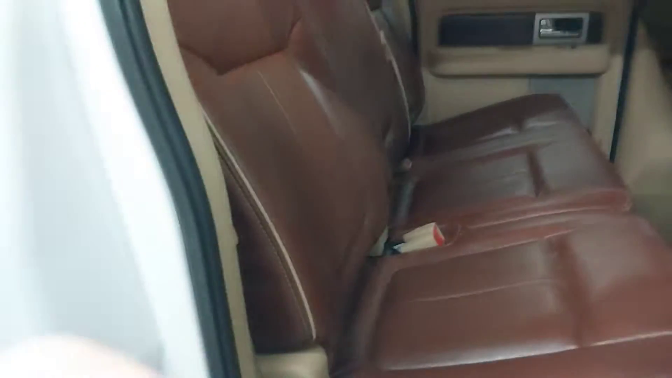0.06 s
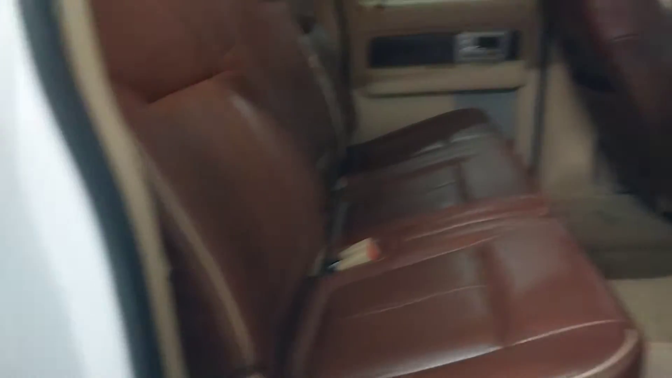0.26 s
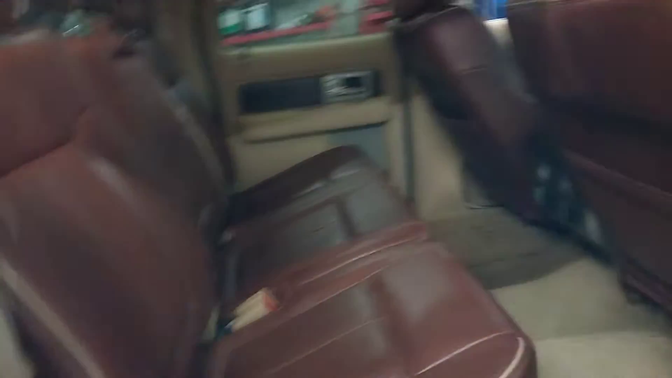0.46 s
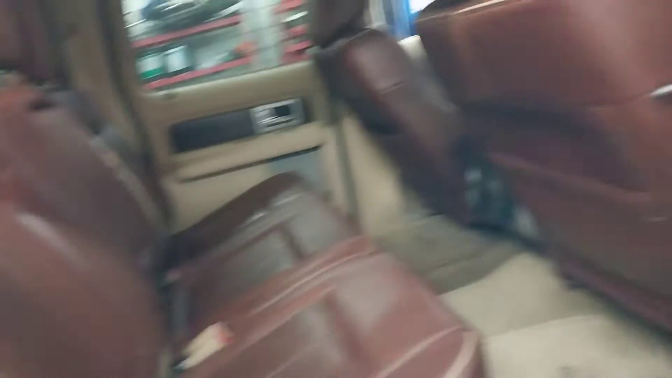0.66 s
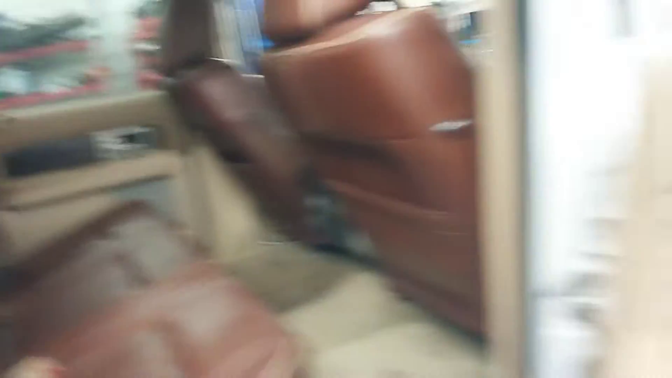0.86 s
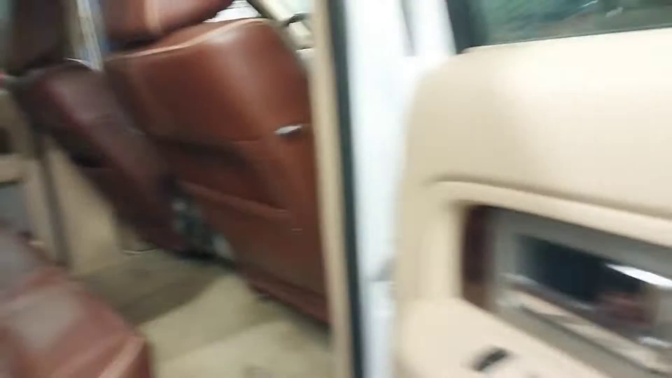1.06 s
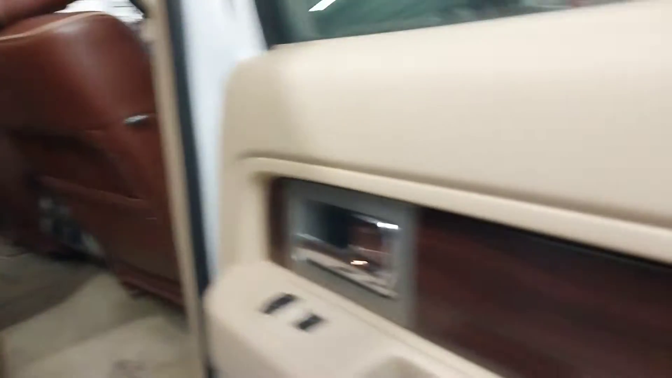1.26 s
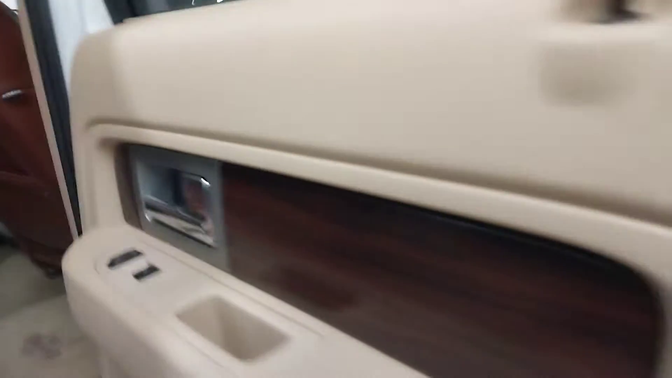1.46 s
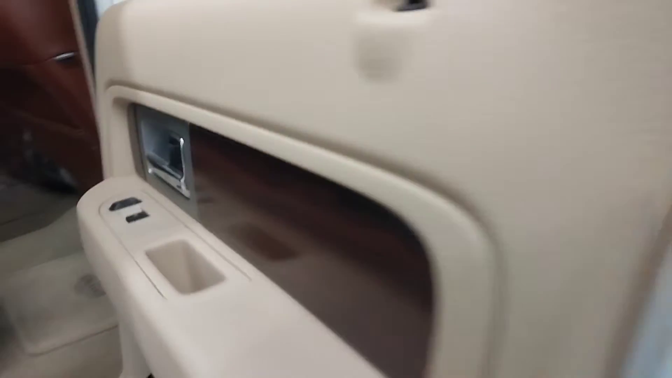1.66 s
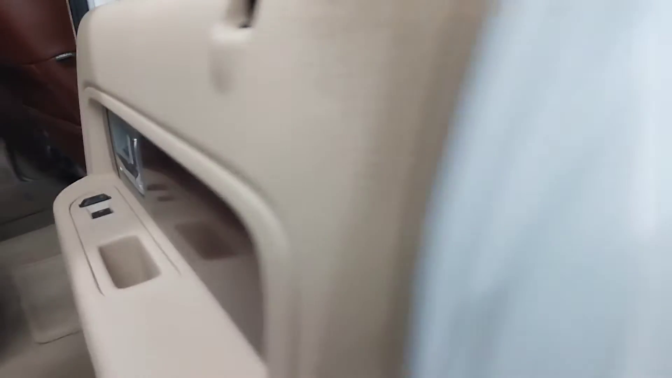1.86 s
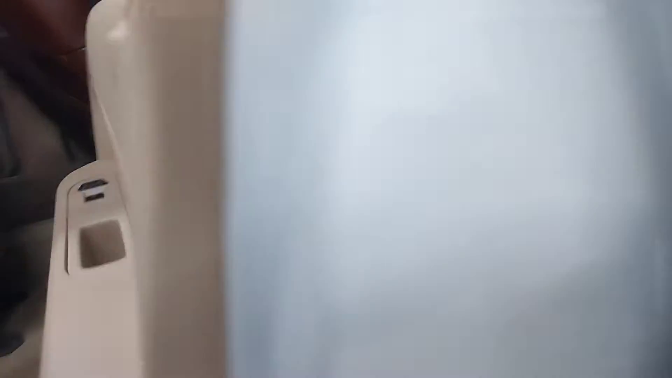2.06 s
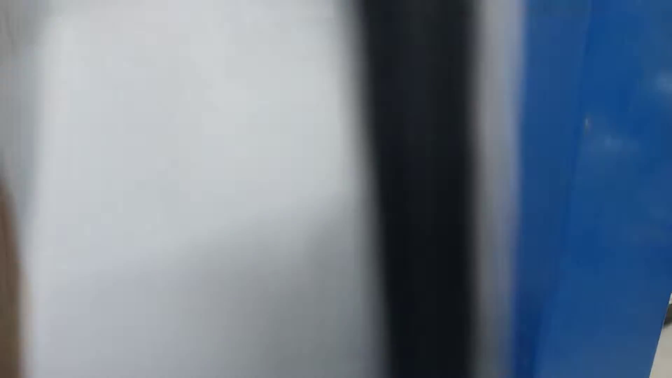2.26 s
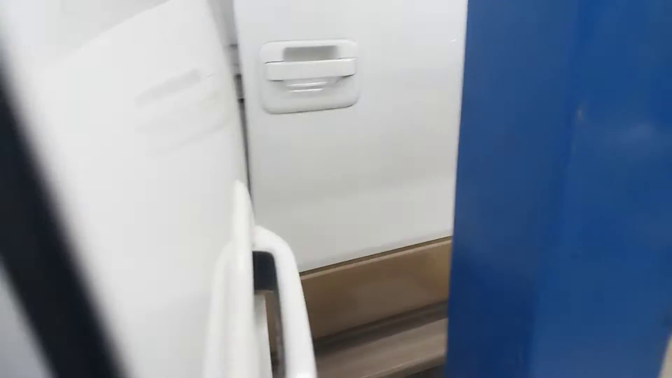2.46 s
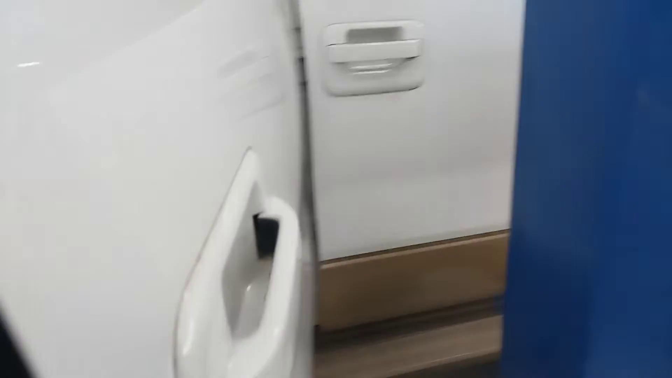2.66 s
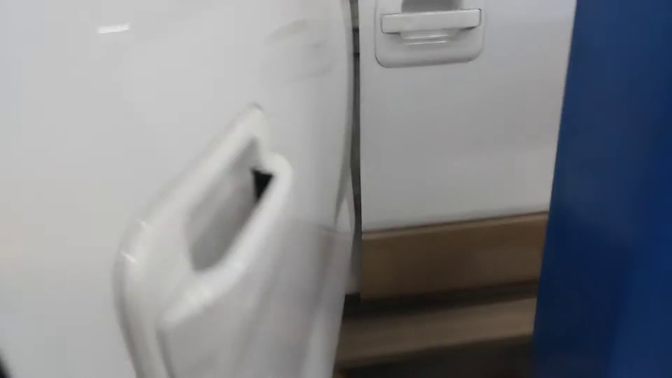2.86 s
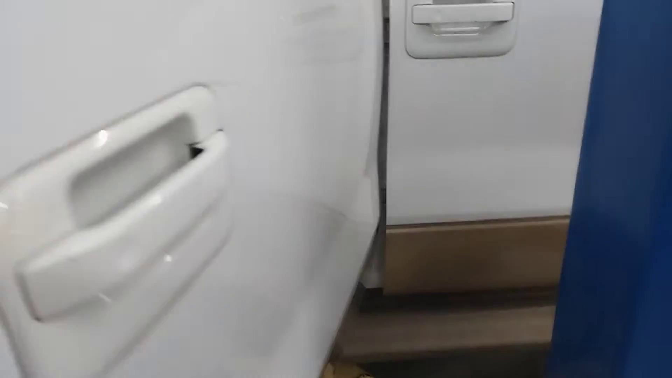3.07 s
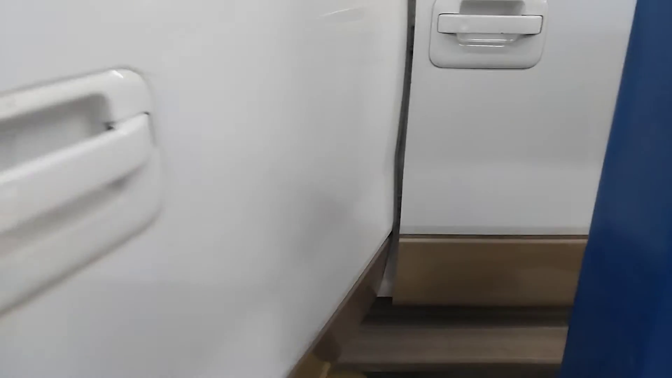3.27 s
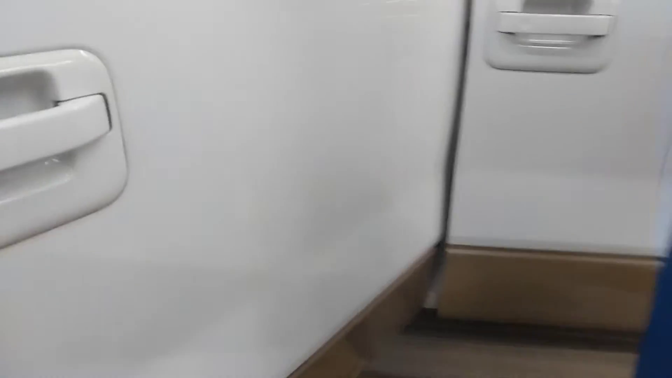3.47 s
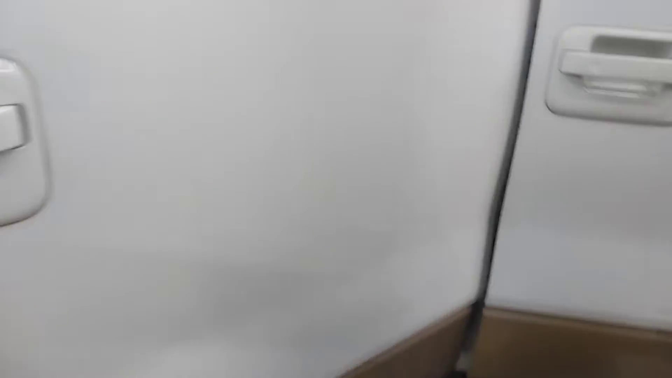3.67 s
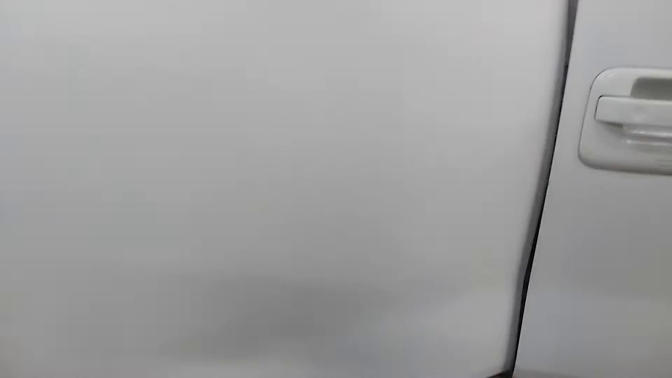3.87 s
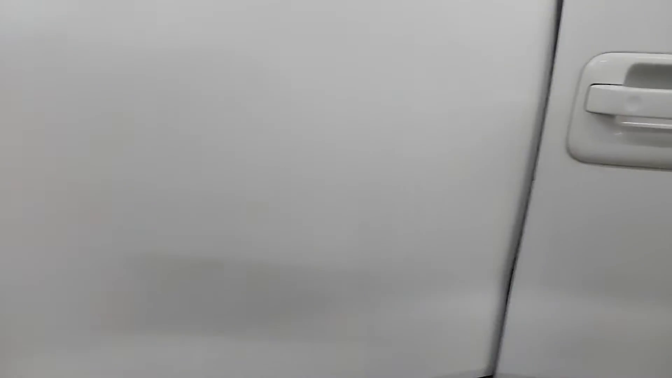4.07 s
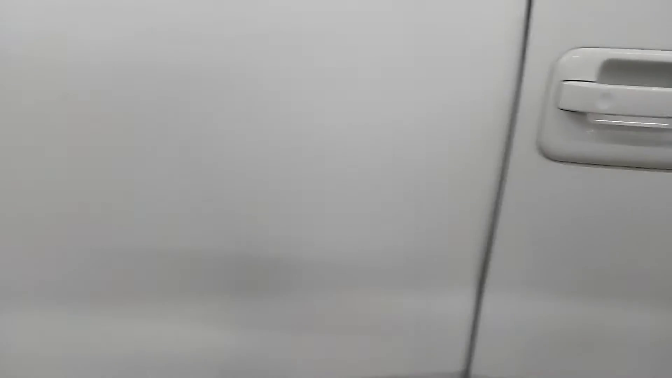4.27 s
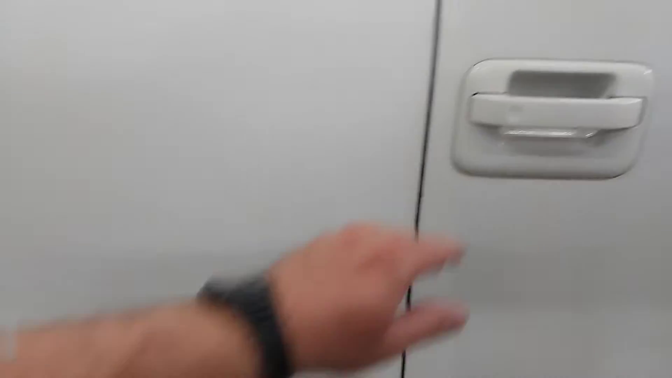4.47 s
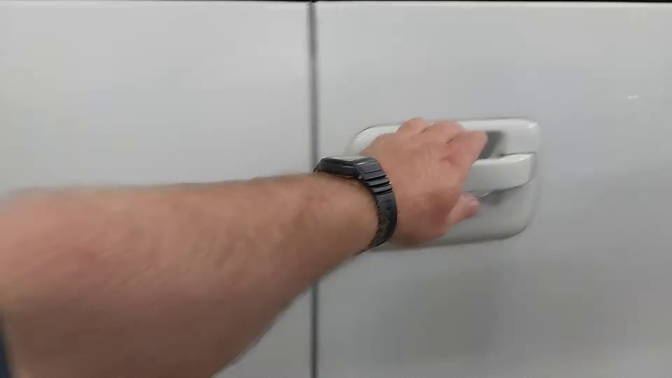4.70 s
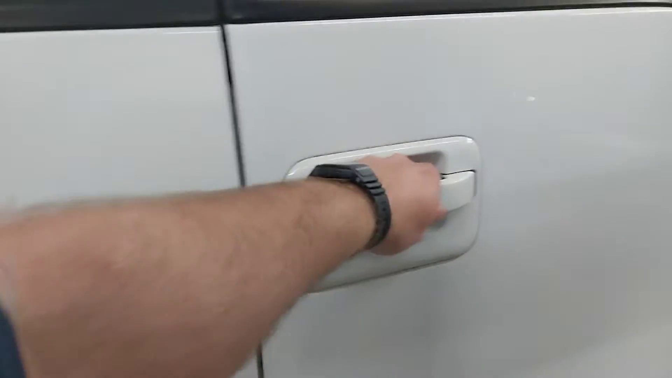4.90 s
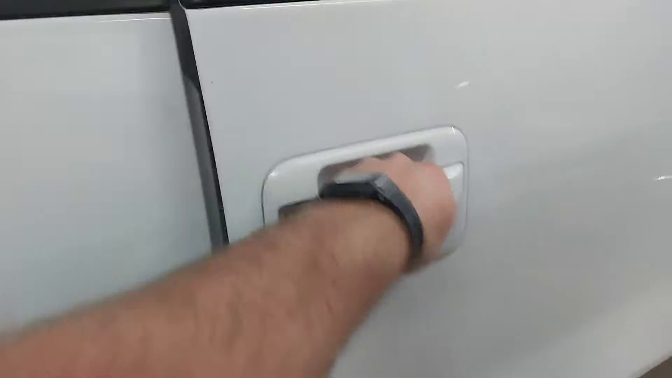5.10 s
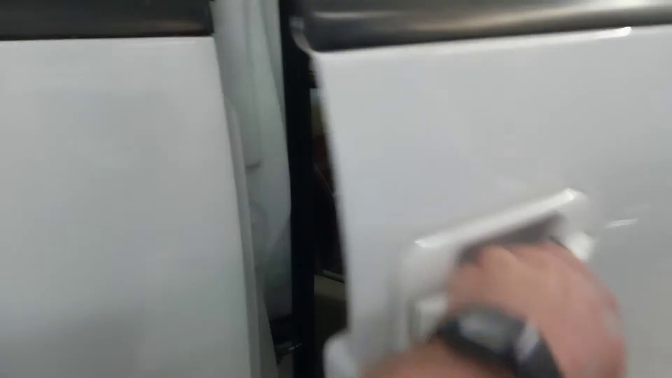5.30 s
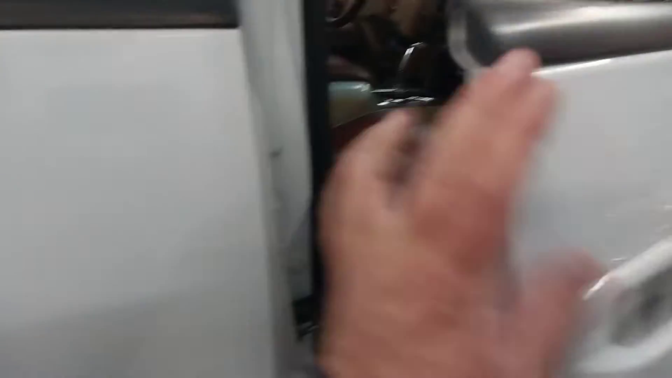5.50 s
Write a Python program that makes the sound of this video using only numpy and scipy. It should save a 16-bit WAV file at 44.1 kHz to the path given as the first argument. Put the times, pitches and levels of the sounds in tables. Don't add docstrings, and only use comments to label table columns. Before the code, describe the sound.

Ventilation rumble and faint handling noises, then a hard, booming car door slam with rattling panel, followed by a sharp latch release and small knocks.

```python
import sys
import numpy as np
from scipy import signal
from scipy.fft import rfft, irfft, next_fast_len
from scipy.io import wavfile
from scipy.ndimage import uniform_filter1d

SR = 44100
rng = np.random.default_rng(int(sys.argv[2]) if len(sys.argv) > 2 else 0)


def wav_record(signal):
    frames = np.transpose(np.atleast_2d(signal))
    bounded = np.clip(frames, -1, 1)
    quanta = np.round(bounded * 32767).astype(np.int16)
    wavfile.write(sys.argv[1], SR, quanta)


def gain_from_db(level_db):
    decades = np.asarray(level_db, float) / 20
    return 10 ** decades


N = 244358
PADDED = next_fast_len(N + SR)
HZ = np.maximum(np.arange(PADDED // 2 + 1) * SR / PADDED, 1)
T = np.arange(N) / SR


def rms_one(x):
    return x / np.sqrt(np.mean(x ** 2) + 1e-20)


def at_hz(points, hz):
    points_hz, values = np.transpose(points)
    return np.interp(np.log(hz), np.log(points_hz), values)


def drift(rate_hz):
    r = np.exp(-80 * np.pi * rate_hz / SR)
    slow = signal.lfilter([1], [1, -2 * r, r * r], rng.standard_normal(N // 40 + 2002))[2000:]
    return np.interp(np.arange(N) / 40, np.arange(len(slow)), rms_one(slow))


def resonance(x, hz, width_hz):
    r = np.exp(-np.pi * width_hz / SR)
    b = np.array([1, 0, -1]) * (1 - r * r) / 2
    a = [1, -2 * r * np.cos(2 * np.pi * hz / SR), r * r]
    return signal.lfilter(b, a, signal.lfilter(b, a, x))


def whistle(hz):
    return np.sin(2 * np.pi * np.cumsum(hz) / SR)


def diffuse():
    # (frequency [Hz], correlation [1])
    likeness = [(60, 0.79), (130, 0.9), (290, 0.96), (640, 0.44), (1410, -0.17), (3100, 0.16),
                (6820, -0.088), (15000, -0.082)]
    mid, side = rfft(rng.standard_normal((2, PADDED)))
    alike = np.clip(at_hz(likeness, HZ), -1, 1)
    return np.sqrt(1 + alike) * mid + np.sqrt(1 - alike) * side * [[1], [-1]]


def coloured(spectrum, flicker_db, rate_hz):
    noise = irfft(diffuse() * gain_from_db(at_hz(spectrum, HZ)), PADDED)[:, :N]
    return rms_one(noise * gain_from_db(flicker_db * drift(rate_hz)))


def strokes(rows, rise_db_per_s=500):
    out = 0
    for s, hold_s, db, t60_s in rows:
        rise_db = rise_db_per_s * np.maximum(s - T, 0)
        fade_db = 60 / t60_s * np.maximum(T - s - hold_s, 0)
        out = out + gain_from_db(db - rise_db - fade_db)
    return out


def ventilation():
    # (time [s], rumble level [dB])
    openness = [(0.0, -36), (0.33, -36.5), (0.6, -37.5), (0.8, -35), (1.26, -36.5), (1.62, -37),
                (1.99, -40), (2.6, -39), (3.3, -42.5), (3.9, -41), (4.34, -41.5), (4.58, -41)]
    # (frequency [Hz], density [dB per Hz])
    rumble_colour = [(18, -50), (30, -12), (87, 3), (113, 2), (140, -3.5), (208, -2.5), (265, -6.5),
                     (310, -17.5), (450, -19), (580, -26), (990, -120)]
    # (frequency [Hz], density [dB per Hz])
    hiss_colour = [(190, -21), (300, -5), (420, -8.5), (612, -7.5), (889, -2), (1270, -2), (1760, -4.5),
                   (2500, -10.5), (3100, -20.5), (3400, -28), (3700, -34.5), (6440, -31.5), (8360, -55.5),
                   (9670, -36.5), (10800, -34.5), (16000, -49)]
    rumble_db = np.interp(T, *np.transpose(openness))
    hiss_db = -46 + 0.49 * (rumble_db - rumble_db.mean()) - 0.72 * T
    rumble = gain_from_db(rumble_db - 3.5) * coloured(rumble_colour, 2.45, 4.15)
    return rumble + gain_from_db(hiss_db) * coloured(hiss_colour, 0.44, 0.99)


def machinery():
    # (time [s], frequency [Hz], level [dB])
    drone_curve = [(.5, 94, -58), (.7, 99.3, -28), (.88, 98.2, -32.5), (.98, 95.5, -50), (1.15, 103.3, -35),
                   (1.22, 99.6, -29), (1.3, 74.8, -33), (1.4, 67, -30), (1.5, 65.2, -93)]
    # (full from [s], hold [s], level [dB], fade t60 [s])
    swells = [(1.3, 0.25, -53, 0.94), (1.7, 0.19, -57.5, 1), (2.15, 0.29, -52, 0.79),
              (3.3, 0.17, -60, 0.43), (3.65, 0.34, -53.5, 0.65), (4.2, .05, -50, 1)]
    # (frequency [Hz], width [Hz], level [dB])
    tones = [
        (385, 2, -63.5),
        (1138, 0.93, -66),
        (225.5, 13.5, -61),
    ]
    s, hz, db = np.transpose(drone_curve)
    running = (T >= s[0]) & (T <= s[-1])
    drone_db = np.interp(T, s, db) - 5 + 2 * drift(7.1)
    out = running * gain_from_db(drone_db) * whistle(np.interp(T, s, hz) + 1.2 * drift(16.0))
    far = rms_one(resonance(rng.standard_normal(N), 292, 230))
    out = out + strokes(swells, rise_db_per_s=200) * far
    for hz, width_hz, db in tones:
        out = out + gain_from_db(db) * rms_one(resonance(rng.standard_normal(N), hz, width_hz))
    return out


def friction():
    # (full from [s], hold [s], level [dB], fade t60 [s])
    rustle = [(0.0, .005, -51, 0.2), (.1, 0.11, -59, 0.69), (.26, .03, -58, 0.72), (.45, 0.32, -63, 1.4),
              (1.12, 0.032, -68, 0.55), (1.62, .01, -57.5, 0.28), (1.71, 0.052, -60, 1.2),
              (2.07, 0.11, -54, 0.12), (2.215, 0.14, -53.5, 0.081), (2.415, 0.15, -43.5, 0.19),
              (2.64, 0.12, -44.5, 0.76), (2.962, .012, -67, 0.36), (3.2, 0.4, -67, 0.67),
              (3.505, .04, -56, 1.8), (3.78, .03, -76, .9), (3.955, 0.072, -59.5, 0.45),
              (5.13, .005, -42.5, 0.23), (5.25, .1, -66, 0.58), (5.385, 0.019, -57, .7),
              (5.475, 0.084, -58, 0.58)]
    # (full from [s], hold [s], level [dB], fade t60 [s])
    spray = [
        (4.178, 0.075, -44.5, 0.7),
        (4.515, .02, -59, 1.5),
    ]
    # (frequency [Hz], density [dB per Hz])
    cloth_colour = [(1760, -32), (3000, -3), (3700, -8), (4440, -10), (5200, -7.5), (7300, -3.5),
                    (8460, -11.5), (9870, -1), (10400, 5), (12300, 0), (15100, -1.5), (16000, 7.5)]
    # (full from [s], hold [s], level [dB], fade t60 [s])
    scuff = [
        (0.0, 0.15, -44.5, 0.69),
        (.24, .01, -56, 0.27),
    ]
    # (frequency [Hz], density [dB per Hz])
    sole_colour = [(350, -42), (600, -32), (862, -18), (966, -21), (1120, -21), (1450, -6), (1750, 9.5),
                   (2150, -8), (2600, -3), (3200, -13.5), (3650, -4.5), (4250, -10.5), (4700, -21),
                   (5500, -16), (7000, -28.5), (11700, -54), (19800, -120)]
    # (full from [s], hold [s], level [dB], fade t60 [s])
    swish = [(.62, 0.34, -71.5, 0.83), (1.71, 0.16, -67, 0.22), (3.22, 0.15, -75.5, 0.46)]
    cloth = (strokes(rustle) + strokes(spray, rise_db_per_s=4000)) * coloured(cloth_colour, 1.04, 27.0)
    sole = gain_from_db(2.0) * strokes(scuff) * coloured(sole_colour, 0.75, 49.0)
    sleeve = strokes(swish) * rms_one(resonance(rng.standard_normal((2, N)), 3960, 600))
    return cloth + sole + sleeve


def squeaks():
    # (time [s], length [s], start [Hz], end [Hz], level [dB])
    squeak_rows = [(4.925, .095, 12850, 13900, -63), (5.005, .07, 13800, 13450, -57),
                   (4.88, .055, 14800, 14100, -68), (4.925, .05, 14100, 15100, -71),
                   (4.865, .1, 10750, 10200, -71), (4.96, .105, 10550, 10250, -72),
                   (4.87, .09, 11950, 12050, -72), (3.27, .1, 13000, 12300, -79),
                   (3.36, .08, 11600, 12400, -81), (3.34, .11, 10300, 9500, -80),
                   (3.3, .06, 11200, 10500, -79), (3.42, .07, 12600, 11700, -79),
                   (4.93, .05, 14100, 13000, -70)]
    edge_s = 0.0067
    out = 0
    for s, length_s, from_hz, to_hz, db in squeak_rows:
        end_s = s + length_s
        hz = np.interp(T, [s, end_s], [from_hz, to_hz]) + 70 * drift(170.0)
        on = np.clip(np.minimum(T - s, end_s - T) / edge_s, 0, 1)
        out = out + on * gain_from_db(db - 1 + 3.5 * drift(40.0)) * whistle(hz)
    return out


def crack_rows():
    # (time [s], peak [dB], t60 [s])
    ticks = [(.195, -31.5, .02), (.25, -39, 0.047), (1.137, -25.5, 0.009), (1.185, -41, .04),
             (1.613, -38, 0.017), (2.496, -21, 0.0046), (5.02, -35, .3), (2.957, -28.5, 0.027),
             (2.968, -31.5, 0.046), (3.128, -43, 0.0064), (3.501, -37, 0.38), (3.779, -31, 0.013),
             (4.513, -38, 0.031), (4.94, -52, 0.027), (5.389, -33, 0.055), (5.471, -23.5, 0.019)]
    # (time [s], peak [dB], centre [Hz], t60 [s])
    knocks = [(0.189, -23.5, 604, 0.044), (0.252, -27.5, 3300, .04), (1.134, -31.5, 597, 0.05),
              (1.612, -32, 870, 0.019), (2.493, -34, 1380, 0.026), (2.495, -37, 2600, 0.018),
              (4.816, -32, 2140, 0.065), (4.903, -33, 2450, 0.068), (2.818, -34, 1820, 0.11),
              (2.818, -31, 2890, 0.1), (2.496, -32, 1500, 0.014), (4.176, -40, 3400, 0.068),
              (4.6764, -23, 900, 0.033), (2.819, -37, 910, 0.078), (2.867, -38.5, 2240, 0.11),
              (2.961, -34, 1240, 0.063), (2.97, -32, 2140, 0.057), (3.6, -44.5, 4400, 0.38)]
    # (time [s], peak [dB], centre [Hz], t60 [s])
    clatter = [(4.176, -23.5, 2160, 0.069), (4.182, -22.5, 2300, 0.19), (4.186, -29, 6040, 0.19),
               (4.195, -30, 2820, 0.076), (4.203, -26.5, 2470, 0.037), (4.208, -32, 3480, 0.036),
               (4.225, -43, 2600, 0.066), (4.27, -12.5, 5560, 0.003), (4.27, -15, 11500, 0.0049),
               (4.19, -28, 10500, 0.11)]
    # (time [s], peak [dB], centre [Hz], t60 [s], hall feed [dB])
    latch = [(4.621, -32.5, 1350, 0.092, 0.5), (4.621, -30, 4500, 0.1, -21),
             (4.635, -20.5, 2240, 0.13, -8.5), (4.633, -23, 11200, 0.31, -2.5),
             (4.639, -14, 13000, .03, -7), (4.639, -20, 5000, .05, -18), (4.6768, -14.5, 2120, 0.061, -19),
             (4.673, -14, 5000, 0.055, -32), (4.683, -26, 5000, .02, -20), (4.674, -13.5, 10700, 0.053, -9),
             (4.678, -17, 4840, 0.017, -4), (5.066, -25, 11000, .03, -20), (5.0705, -11, 11500, 0.02, -7.5),
             (5.0711, -26.5, 2540, 0.02, -12), (5.087, -18, 10870, 0.017, -18),
             (5.108, -8.5, 11500, 0.012, -22), (5.11, -26.5, 870, 0.18, -15),
             (5.112, -22.5, 2800, 0.091, -16), (5.126, -31, 15000, 0.066, 3),
             (5.473, -20.5, 1460, 0.033, -23)]
    rows = [(s, db, 8650, 40000, t60_s, -16) for s, db, t60_s in ticks]
    rows += [(s, db, hz, 123 + 0.55 * hz, t60_s, -18) for s, db, hz, t60_s in knocks]
    metal = [(*row, -15) for row in clatter] + list(latch)
    rows += [(s, db, hz, 123 + 0.77 * hz, t60_s, hall_db) for s, db, hz, t60_s, hall_db in metal]
    return rows


def cracks():
    near, far = np.zeros((2, N)), np.zeros(N)
    t = np.arange(SR // 4) / SR
    for s, db, hz, width_hz, t60_s, hall_db in crack_rows():
        i = round(s * SR)
        shape = gain_from_db(db - 5.0 - 60 * t / t60_s) * (1 - np.exp(-t / (0.067 * t60_s)))
        burst = rms_one(resonance(rng.standard_normal((2, len(t))), hz, width_hz)) * shape
        near[:, i:i + len(t)] += burst[:, :N - i]
        click = rms_one(resonance(1. * (t == 0), hz, width_hz))
        click = click * np.sqrt(np.mean(shape ** 2))
        far[i:i + len(t)] += gain_from_db(hall_db) * click[:N - i]
    return near, far


def thuds():
    # (time [s], peak [dB], thud [Hz], t60 [s], panel ring [dB])
    blows = [(4.6183, -3, 275, .075, -28), (4.637, 1, 228, .075, -28), (4.6335, -3, 320, .04, -30),
             (4.676, -4, 310, .05, -20), (5.109, -4, 220, .055, -22), (4.6195, -12, 500, .06, -32),
             (4.6325, -8, 410, .035, -28), (4.6395, -11, 150, .1, -32), (4.65, -16, 62, .33, -40),
             (4.672, -20, 102, .3, -40), (4.688, -15, 700, .04, -24), (4.706, -8, 170, .06, -24),
             (4.657, -20, 190, .03, -34), (4.655, -20, 480, .05, -32), (4.691, -10, 330, .04, -26),
             (4.722, -11, 165, .07, -27), (4.742, -13, 155, .08, -30), (4.763, -13, 270, .06, -30),
             (4.785, -18, 200, .07, -33), (4.816, -23, 240, .12, -32), (4.733, -14, 150, .07, -32),
             (5.132, -14, 260, .05, -30), (5.149, -18, 200, .08, -32), (5.172, -17, 170, .07, -34),
             (5.398, -30, 160, .1, -50), (5.4875, -21, 300, .03, -40), (5.527, -25, 320, .06, -40),
             (5.5, -24, 200, .06, -40), (5.111, -12, 390, .06, -26), (5.118, -18, 580, .08, -26),
             (5.145, -21, 105, .3, -50), (5.472, -27, 850, .02, -44), (5.476, -24, 330, .09, -34),
             (5.492, -14, 235, .04, -32), (5.512, -21, 320, .12, -38)]
    # (time [s], peak [dB], thud [Hz], t60 [s], hall feed [dB])
    bumps = [(0.191, -31, 362, 0.049, -26), (0.341, -24.5, 208, 0.11, -13), (1.134, -17, 158, 0.034, -32),
             (1.131, -25.5, 369, 0.045, -24), (1.133, -34.5, 710, 0.035, -30), (.193, -37.5, 660, .04, -28),
             (1.612, -36, 586, 0.027, -26), (2.82, -42.5, 590, 0.076, -20), (1.18, -15, 135, 0.022, -12),
             (1.615, -26.5, 200, 0.053, -41), (2.01, -25.5, 182, 0.078, -10),
             (2.407, -45.5, 1110, 0.6, -45), (2.486, -21, 200, 0.038, -31),
             (2.4973, -3.5, 224, 0.0093, -49), (2.494, -25, 620, 0.028, -46),
             (2.821, -28.5, 320, 0.015, -9.5), (2.952, -19.5, 259, 0.015, -9.5),
             (2.959, -27, 595, 0.022, -40), (2.967, -16, 100, 0.039, -16.5), (3.616, -22, 226, 0.015, -17),
             (3.922, -38.5, 417, 0.11, -17), (3.991, -29, 82, 0.13, -11.5),
             (4.176, -17.5, 284, 0.006, -6.5), (4.175, -29.5, 650, 0.017, -15),
             (4.195, -30, 643, 0.13, -31), (4.508, -19.5, 200, 0.0085, -6), (5.071, -29.5, 216, 0.047, 2.5)]
    opening_s = 5.0
    near, far, jolts = np.zeros((3, N))
    t = np.arange(SR // 2) / SR
    sag = 1 + 0.081 * np.exp(-t / 0.013)
    contacts = [(*blow, -20) for blow in blows]
    contacts += [(s, db, hz, t60_s, db - 27, hall_db) for s, db, hz, t60_s, hall_db in bumps]
    for s, db, hz, t60_s, panel_db, hall_db in contacts:
        i = round(s * SR)
        swing = gain_from_db(db - 60 * t / t60_s) * (1 - np.exp(-t * hz / 0.25)) * whistle(hz * sag)
        swing = swing * (1 if s < opening_s else -1)
        near[i:i + len(t)] += swing[:N - i]
        far[i:i + len(t)] += gain_from_db(hall_db) * swing[:N - i]
        jolts[i] += gain_from_db(panel_db)
    return near, far, jolts


def panel(jolts):
    # (frequency [Hz], width [Hz], level [dB], t60 [s])
    panel_modes = [(105.3, 62, -5, 0.57), (164, 6.3, -8.5, 0.48), (200, 204, -7, 0.75),
                   (241, 20, -29, 0.28), (317, 17, -2.5, 0.13), (448, 20.8, -11, 0.31),
                   (778.6, 24, -10.5, 0.13), (465, 136, -17.5, 1), (525, 50, -10, 0.28),
                   (620, 100, -21, 0.32), (686, 32, 4, 0.05), (1080, 720, 1, 0.053)]
    white, out = irfft(diffuse(), PADDED)[:, :N], 0
    for hz, width_hz, db, t60_s in panel_modes:
        fall, rise = gain_from_db(-60 / (t60_s * SR)), np.exp(-hz / (2.5 * SR))
        shudder = signal.lfilter([1 - rise], np.convolve([1, -fall], [1, -rise]), jolts + 1e-18)
        rattle = white + 150 / hz * np.mean(white, axis=0)
        out = out + gain_from_db(db - 12.5) * shudder * rms_one(resonance(rattle, hz, width_hz))
    return out


def leaning(x):
    # (time [s], length [s])
    grips = [(1.125, .035), (1.175, .03), (1.605, .025), (2.48, .035), (2.948, .045)]
    grip_db, door_db = -22, 1.5
    right_lag_s = 0.00023
    gripped = sum(1. * (T > s) * (T < s + length_s) for s, length_s in grips)
    gripped = uniform_filter1d(gripped, size=200)
    lean = gain_from_db(door_db + (grip_db - door_db) * gripped)
    lag = np.exp(-1j * np.pi * HZ * right_lag_s * np.array([[-1], [1]]))
    lagged = irfft(rfft(x, PADDED) * lag, PADDED)[:, :N]
    return lagged * 2 / (1 + lean) * np.array([lean, np.ones(N)])


def hall(x):
    # (frequency [Hz], t60 [s])
    hall_t60 = [(60, 0.33), (160, 0.19), (420, 0.62), (1100, 0.83), (2900, 1.15), (7700, 0.99),
                (15000, 1.15)]
    # (frequency [Hz], level [dB])
    hall_colour = [(40, 16.5), (100, 1), (300, 0.5), (1000, 2), (3000, -5.5), (5500, -7), (8500, -13),
                   (11000, -15), (15000, -17)]
    t, tail = np.arange(SR) / SR, 0
    white = irfft(diffuse(), PADDED)[:, :2 * SR].reshape(2, 2, SR)
    borders_hz = 35 * 2 ** np.arange(0, 9.1, 1 / 3)
    for k, (low_hz, high_hz) in enumerate(zip(borders_hz, borders_hz[1:])):
        hz = np.sqrt(low_hz * high_hz)
        sos = signal.butter(2, [low_hz, high_hz], "band", fs=SR, output="sos")
        fade_db = at_hz(hall_colour, hz) - 60 * t / at_hz(hall_t60, hz)
        tail = tail + signal.sosfilt(sos, white[:, k % 2]) * gain_from_db(fade_db)
    tail = tail * (1 - np.exp(-t / 0.0012)) * gain_from_db(-20.5)
    return irfft(rfft(x, PADDED) * rfft(tail, PADDED), PADDED)[:, :N]


def housing(x):
    # (frequency [Hz], gain [dB])
    shell = [(2000, 1), (3450, -3), (3900, -5.5), (5500, -4), (7300, -8), (8600, -19), (9800, -9),
             (15500, -10)]
    return irfft(rfft(x, PADDED) * gain_from_db(at_hz(shell, HZ)), PADDED)[:, :N]


def scene():
    thud, thud_far, jolts = thuds()
    crack, crack_far = cracks()
    contacts = leaning(thud + crack) + panel(jolts) + hall(thud_far + crack_far)
    return ventilation() + machinery() + friction() + squeaks() + housing(contacts)


def low_pass(x):
    return signal.sosfilt(signal.butter(12, 16610, fs=SR, output="sos"), x)


def record(dry):
    # (frequency [Hz], left minus right [dB])
    ports = [(60, -2), (92, -2.5), (140, -1.5), (210, -1.5), (330, -1.5), (500, -2.5), (770, -3.5),
             (1170, -5), (1790, -7.0), (2740, -13.5), (4190, 3), (6410, -5), (9810, -16), (15000, 2.5)]
    tilt = gain_from_db(at_hz(ports, HZ) / 2 * np.array([[1], [-1]]))
    x = irfft(rfft(dry, PADDED) * tilt / np.mean(tilt, axis=0), PADDED)[:, :N]
    x = signal.sosfilt(signal.butter(2, 40.0, "high", fs=SR, output="sos"), x)
    x = signal.sosfilt(signal.cheby2(12, 60, 16600, fs=SR, output="sos"), x)
    mix = 1.8 * np.tanh(x / 1.8)
    return low_pass(mix)


dry = scene()
out = record(dry)
wav_record(out)
```